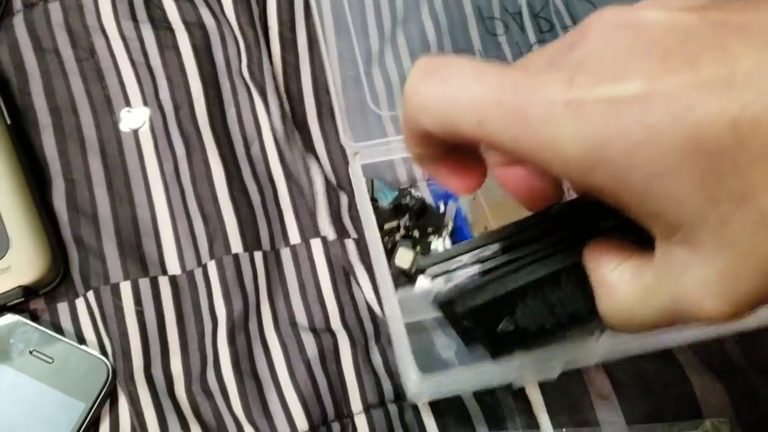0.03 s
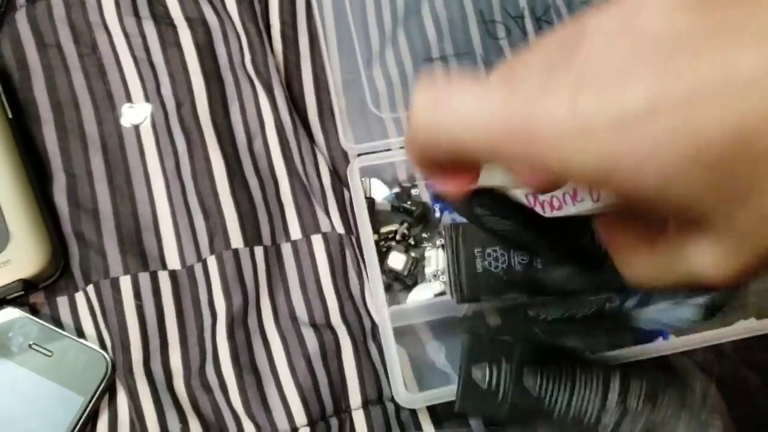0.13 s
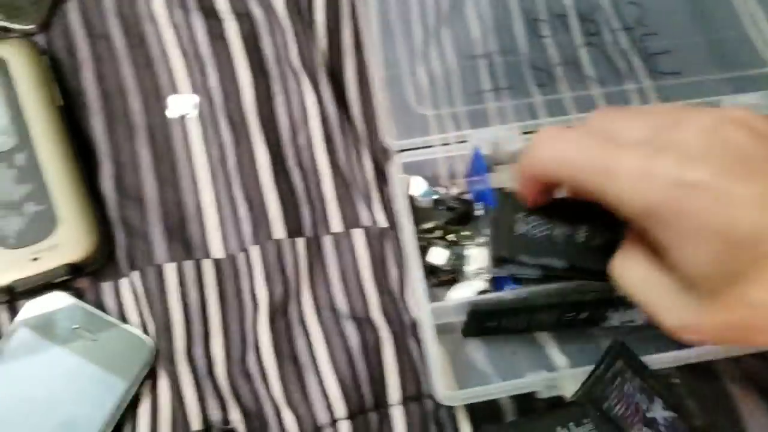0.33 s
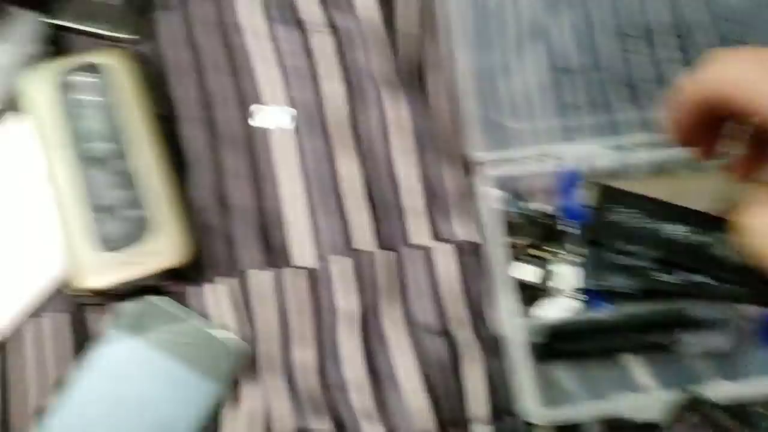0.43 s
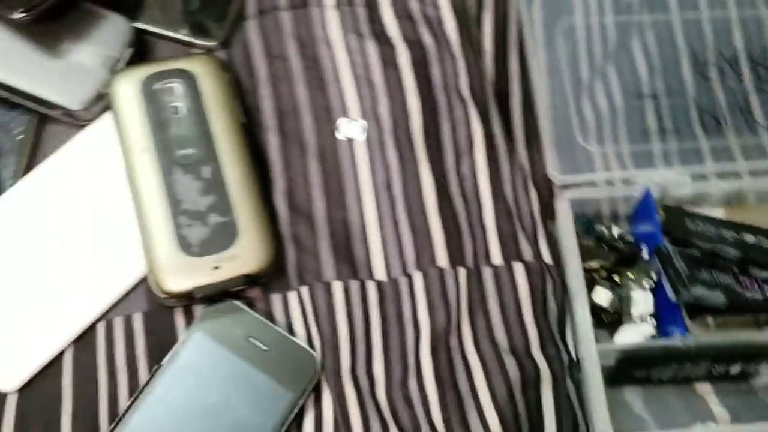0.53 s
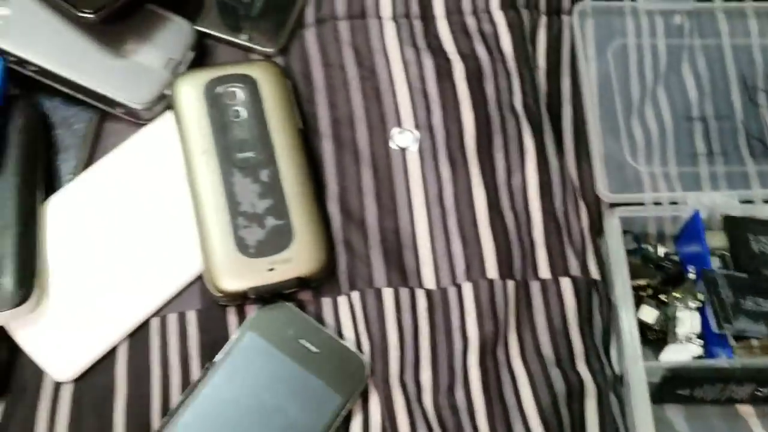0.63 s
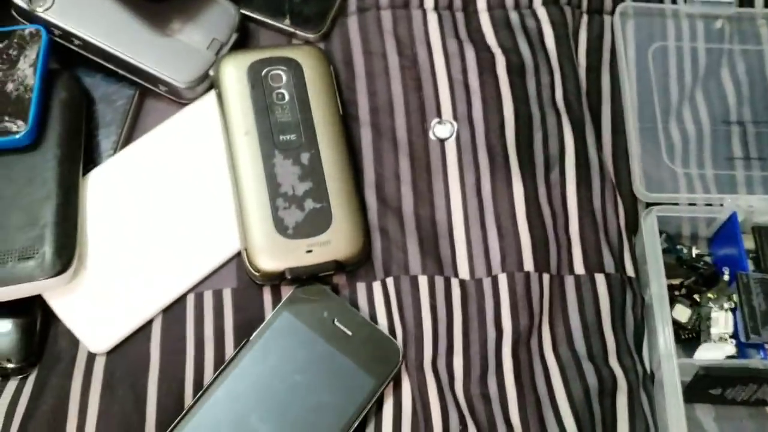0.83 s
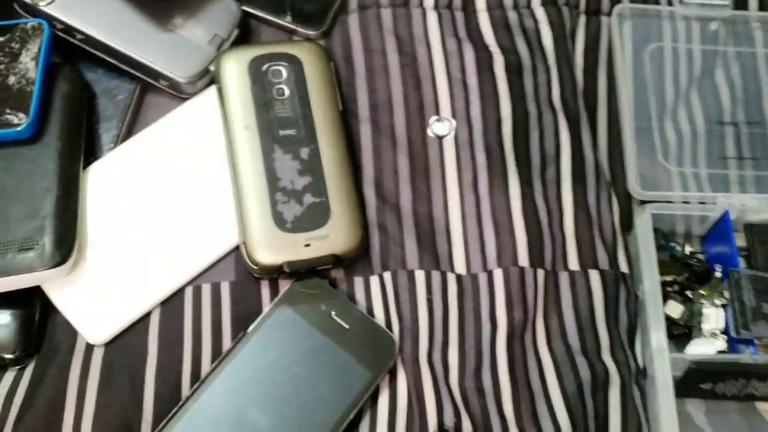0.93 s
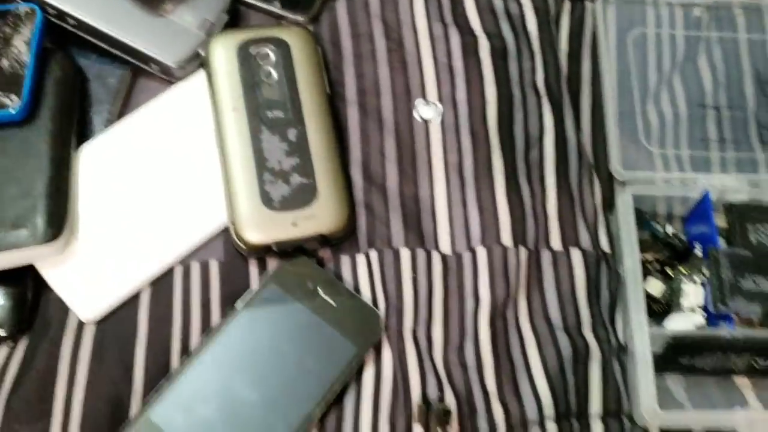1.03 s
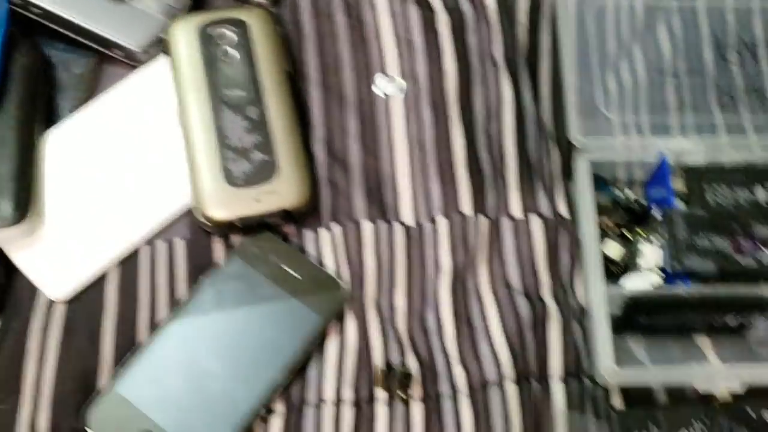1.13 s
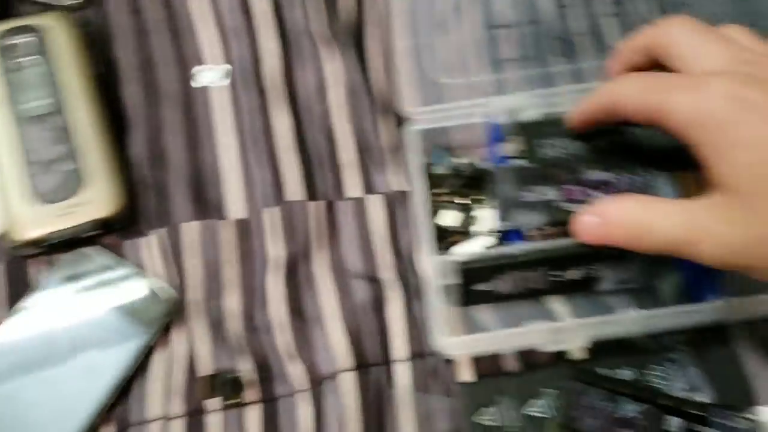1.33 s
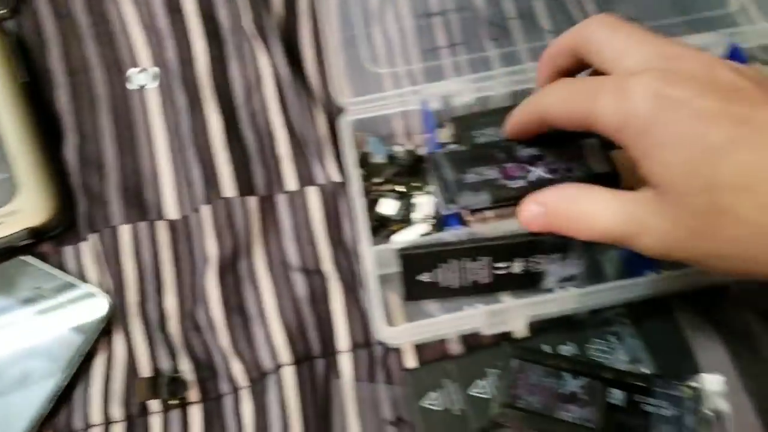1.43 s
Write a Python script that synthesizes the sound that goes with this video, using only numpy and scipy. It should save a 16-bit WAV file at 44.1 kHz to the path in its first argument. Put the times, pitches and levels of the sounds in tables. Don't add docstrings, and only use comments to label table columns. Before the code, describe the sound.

Small flat parts clatter into a hollow plastic box in one short burst, then settle

```python
import sys
import numpy as np
from scipy import signal
from scipy.io import wavfile
from scipy.ndimage import uniform_filter1d

SR = 44100
rng = np.random.default_rng(int(sys.argv[2]) if len(sys.argv) > 2 else 0)


def master_out(mix):
    frames = np.transpose(np.atleast_2d(mix))
    ceiling = np.clip(frames, -1, 1)
    pcm = np.round(ceiling * 32767).astype(np.int16)
    wavfile.write(sys.argv[1], SR, pcm)


def convert_level_to_amplitude(level_db):
    exponent = np.asarray(level_db, float) / 20
    return 10 ** exponent


N = 66150

# f/Hz, level/dB
BRIGHT = [(300, -24.5), (1200, -10), (2500, -17), (3300, -0.5), (6500, -8.5), (13000, -5), (16000, -8.5)]
# f/Hz, level/dB
DULL = [(88, -20), (150, -3), (259, -11.5), (1080, -7.5), (1340, -11), (1790, -5.5), (12400, -23.5),
        (15100, -24.5), (16000, -51.5)]


def evened(x):
    return x / np.sqrt(np.mean(x ** 2) + 1e-20)


def read(points, hz):
    f, value = np.transpose(points)
    return np.interp(np.log(hz + 1), np.log(f + 1), value)


def add(mix, start, sound):
    part = mix[round(start * SR):][:len(sound)]
    part += sound[:len(part)]


def high(x, hz, order=2):
    return signal.sosfilt(signal.butter(order, hz, "high", fs=SR, output="sos"), x)


def colour(x, points, share=1):
    hz = abs(np.fft.fftfreq(2048, 1 / SR))
    log_gain = share * read(points, hz) * np.log(10) / 20
    taps = np.fft.ifft(np.exp(np.conj(signal.hilbert(log_gain)))).real[:1024]
    return signal.oaconvolve(x, taps)[:len(x)]


def resonate(x, hz, width):
    return signal.lfilter(*signal.iirpeak(min(hz, SR / 2.2), hz / width, SR), x)


def air():
    # f/Hz, level/dB
    air_tone = [(25, -12.5), (114, -6), (260, -14), (440, -32.5), (1700, -36.5), (2690, -31.5),
                (4000, -28.5), (16000, -36.5)]
    shared, left, right = (colour(noise, air_tone) for noise in rng.standard_normal((3, N)))
    low = signal.butter(2, 700, fs=SR)
    rumble = signal.lfilter(*low, shared)
    hiss = np.array([noise - signal.lfilter(*low, noise) for noise in (left, right)])
    return convert_level_to_amplitude(-68.5) * evened(rumble + hiss)


def grains():
    per_s, spread_db = 6000, 2.5
    size = convert_level_to_amplitude(spread_db * np.minimum(rng.exponential(1, N), 5))
    clicks = size * (rng.random(N) < per_s / SR) * rng.choice([-1., 1.], N)
    return evened(clicks) + 0.6 * rng.standard_normal(N)


def jostle():
    # t/s, small pieces level/dB, rubbing on walls level/dB
    jostling = [(0, -85, -81.5), (0.114, -65.5, -74.5), (0.13, -41, -48), (0.203, -41.5, -50.5),
                (0.211, -23, -23.5), (0.328, -36, -32.5), (0.456, -46.5, -40.5), (0.486, -55.5, -54.5),
                (0.6, -50.5, -56.5), (0.624, -45.5, -37), (0.721, -58.5, -61), (0.828, -81, -49.5),
                (0.922, -99, -95), (1.038, -77, -108), (1.079, -64, -77.5), (1.19, -65, -68),
                (1.321, -69.5, -74), (1.469, -70, -56.5)]
    s, pieces_db, walls_db = np.transpose(jostling)
    t = np.arange(N) / SR
    pieces = evened(high(colour(grains(), BRIGHT), 1500))
    walls = evened(colour(grains(), DULL))
    level = np.interp(t, s, walls_db)
    edge = high(walls, 750)
    softened = walls - edge + edge * convert_level_to_amplitude(0.085 * (level - level.max()))
    return convert_level_to_amplitude(np.interp(t, s, pieces_db)) * pieces + convert_level_to_amplitude(level) * softened


def rubs():
    # t/s, length/s, level/dB, f/Hz, width/Hz
    drags = [
        (0.065, 0.075, -69.5, 1770, 620),
        (1.105, 0.037, -68.5, 1040, 210),
        (1.145, 0.14, -64, 280, 220),
        (1.432, 0.035, -52, 980, 270),
        (1.40, 0.098, -69.5, 2200, 2500),
    ]
    out = np.zeros(N)
    for start, length, db, hz, width in drags:
        t = np.arange(0, min(length, 0.2), 1 / SR)
        noise = rng.standard_normal(9000)
        rough = evened(resonate(resonate(noise, hz, width), hz, width))[:len(t)]
        add(out, start, convert_level_to_amplitude(db) * np.sin(np.pi * (t / length) ** 0.63) * rough)
    return out


def tick(db, hz, t60):
    noise = rng.standard_normal(3000)
    t = np.arange(len(noise)) / SR
    hiss_db = min(15 * np.log2(hz / 4000), 0)
    hiss = convert_level_to_amplitude(hiss_db) * evened(colour(noise, BRIGHT))
    ring = convert_level_to_amplitude(-3) * evened(resonate(noise, hz, hz / 3))
    fade = convert_level_to_amplitude(db - 7 - 60 * t / max(t60, 0.004))
    rise = np.minimum(t / 0.00087, 1)
    return high(fade * rise * (hiss + ring), min(0.7 * hz, 6000), order=4)


def ticking():
    # t/s, level/dB, f/Hz, time to fade 60 dB/s
    tick_events = [(.1185, -27, 3463, 0.012), (0.125, -25, 3600, 0.018), (0.147, -12, 14600, 0.011),
                   (0.1529, -19, 5200, 0.021), (.162, -26, 4130, 0.01), (.21, -15, 2900, 0.06),
                   (0.229, -14.5, 5600, 0.067), (0.2535, -8, 2900, 0.025), (.284, -18.5, 3730, 0.042),
                   (.348, -35, 12600, 0.011), (0.3703, -29, 4800, 0.057), (0.4034, -8.5, 3000, 0.02),
                   (0.518, -43, 5400, 0.045), (0.5814, -31.5, 12000, 0.018), (0.607, -19, 3860, 0.032),
                   (0.6843, -27.5, 8300, 0.028), (0.758, -35.5, 3900, 0.025), (.768, -30, 6030, 0.036),
                   (1.048, -35.5, 3900, 0.009), (1.1072, -46, 3540, 0.018), (1.161, -50, 13530, 0.026),
                   (1.3362, -40.5, 2650, .012), (1.356, -44, 3810, 0.054), (1.476, -23.5, 3510, 0.088),
                   (.1435, -30, 13000, .015), (.1555, -19, 12000, .012), (.1825, -27.5, 3600, .012),
                   (.1972, -23.5, 2820, .015), (.2165, -14.5, 4500, .015), (.296, -14.5, 4000, .012),
                   (.3085, -11, 3400, 0.017), (.3225, -24.5, 4500, .012), (.4135, -13, 3500, .015),
                   (.4525, -25, 3500, .015), (.5815, -41, 5000, .025), (.6335, -27, 12000, .012),
                   (.696, -36, 5000, .015), (.735, -46, 9000, .012), (1.188, -50, 12500, .01),
                   (1.262, -53, 11000, .01), (1.3418, -52.5, 11000, .015), (1.3565, -38.5, 11500, .02),
                   (1.458, -49, 3460, .03), (.2125, -13, 12100, .02), (0.2551, -20, 11500, .015),
                   (.4045, -32, 9200, 0.011), (.3815, -16, 3520, 0.016)]
    out = np.zeros(N)
    for start, db, hz, t60 in tick_events:
        add(out, start, tick(db, hz, t60))
    return out


def knock(db, hz, ring_db, crack_db, reach_db):
    # f/Hz, level/dB
    box = [(200, -23.5), (255, -7.5), (318, -2.5), (423, -10), (640, -2), (765, -1.5), (820, 7.5), (926, 1),
           (1075, 8), (1190, 7.5), (1620, 11), (2080, 21), (2245, -19), (2900, 7.5)]
    luck = rng.standard_normal(5000)
    t = np.arange(len(luck)) / SR
    cycles = 3.3 * (hz / 1000) ** 0.4
    push = -np.sin(2 * np.pi * hz * t) * convert_level_to_amplitude(-60 * t * hz / (4 * cycles * (hz / 1000) ** 0))

    f, level = np.transpose(box)[:, :, None]
    near = reach_db * abs(np.log2(f / hz)) + 5 * luck[:len(box), None]
    t60 = 0.041 * (1000 / f) ** 0.75
    detune = 1 + 0.042 * luck[::-1][:len(box), None]
    modes = convert_level_to_amplitude(level + near - 60 * t / t60) * np.sin(2 * np.pi * f * detune * t)
    ring = -modes.sum(0)

    rough = evened(colour(luck * abs(luck) ** 0.34, DULL))
    crack = rough * convert_level_to_amplitude(crack_db - 60 * t / 0.036) * np.minimum(t / 0.0019, 1)
    onset = np.minimum(t * hz / 0.14, 1)
    body = (push + convert_level_to_amplitude(ring_db) * ring / abs(ring).max()) * onset
    return convert_level_to_amplitude(db) * high(body + crack, 0.4 * hz)


def knocking():
    # t/s, peak level/dB, f/Hz, box ring level/dB
    tumble = [(0.1248, -23.5, 2070, -0.5), (.13, -36.5, 1070, -12), (0.155, -34, 1670, -1),
              (.196, -20.5, 333, -16), (0.2092, -7.5, 820, 1.5), (.2158, -5.5, 1630, 4),
              (0.2273, -10, 307, 5.5), (0.2266, -6, 1540, -0.5), (.245, -11.5, 1090, -21),
              (.2545, -9, 832, -14), (0.262, -21, 890, -27), (0.2767, -17, 277, -4), (.284, -20, 870, 5),
              (0.3008, -15, 293.7, -23), (0.308, -45, 1087, -11), (0.318, -28, 300.5, -21),
              (.34, -31, 436, 0), (.344, -29, 860, 7.5), (0.3641, -19, 2090, -3), (0.368, -25.5, 259, -21),
              (.399, -18, 310, -16), (0.4006, -14.5, 817, -8.5), (0.4049, -20, 1014, 6),
              (.4105, -23, 800, -4), (.4435, -26, 390, 7), (0.4518, -30, 290, 7), (0.456, -36.5, 400, -10),
              (1.476, -32, 1230, -4.5), (1.4787, -31.5, 1780, -3.5), (1.482, -36.5, 780, 2),
              (0.1203, -38, 2010, 2), (0.2196, -18.5, 1450, -7), (0.2368, -21.5, 920, -6.5),
              (.2575, -29, 1600, -6), (.2665, -35, 1207, -7), (0.3218, -30, 999, -9), (.3495, -32, 910, -1),
              (.3735, -31, 1300, 3), (.4135, -27.5, 980, 5), (.4285, -31, 900, -4),
              (1.4876, -34, 1096, -2.5)]
    # t/s, peak level/dB, f/Hz
    settle = [(0.496, -42, 276), (0.523, -41.5, 377), (0.551, -46.5, 770), (0.624, -40.5, 341),
              (0.695, -48, 225), (0.738, -50, 382), (0.781, -29.5, 700), (0.823, -46, 261.4),
              (1.176, -52.5, 248.7), (1.19, -53.5, 244.2), (1.206, -48.5, 276.3), (1.445, -51.5, 1044),
              (.609, -35.5, 1250), (.636, -36, 485), (.6555, -32.5, 590), (1.158, -60, 260),
              (.96, -61, 664), (1.109, -57.5, 1070), (1.245, -61.5, 313), (1.275, -59.5, 338),
              (1.3365, -50, 450), (1.3525, -44.5, 260), (1.3512, -45, 703.6), (.126, -48.5, 367),
              (.153, -47, 426), (.585, -53, 240), (.66, -45.5, 220), (.80, -43, 250), (1.125, -63.5, 796),
              (1.165, -58, 620), (1.185, -58, 780), (1.215, -59.5, 560), (1.40, -63.5, 350)]
    out = np.zeros(N)
    for start, db, hz, ring_db in tumble:
        add(out, start, knock(db, hz, ring_db, crack_db=-3, reach_db=-6))
    for start, db, hz in settle:
        add(out, start, knock(db, hz, ring_db=-2, crack_db=-14.5, reach_db=-14))
    return out


def bed(knocks):
    memory = np.exp(-1 / (0.015 * SR))
    effort = np.sqrt(abs(signal.lfilter([1], [1, -memory], knocks ** 2)))
    band = signal.butter(2, [45, 170], "band", fs=SR, output="sos")
    low = signal.sosfilt(band, rng.standard_normal(N))
    return convert_level_to_amplitude(-54) * evened(low * effort ** 0.58)


def slides():
    starts = .6055, .7755
    # length/s, level/dB
    slide_events = [
        (0.048, -32.5),
        (0.069, -32),
    ]
    # f/Hz, width/Hz, level/dB
    piece = [(3620, 61, -6.5), (3930, 190, -2), (5840, 1860, -9), (12060, 570, -5.5)]
    slips, t = grains(), np.arange(N) / SR
    rings = evened(sum(convert_level_to_amplitude(db) * evened(resonate(slips, f, width)) for f, width, db in piece))
    body = evened(rings + 1.4 * evened(colour(slips, BRIGHT)))
    shape = np.zeros(N)
    for start, (length, db) in zip(starts, slide_events):
        hold = 2.8 * np.maximum(t - start, 0) / length
        fade = 690 * np.maximum(t - start - 0.41 * length, 0)
        shape += convert_level_to_amplitude(db - hold - fade) * np.clip((t - start) / 0.00096, 0, 1)
    return shape * body


def scatter(x):
    # f/Hz, random phase/radians
    wandering = [(400, 0.078), (1000, 0.43), (2500, 2.1), (14000, 3.7)]
    lag_s = 0.00012
    hz, _, z = signal.stft(x, SR, nperseg=128, noverlap=96)
    smooth = uniform_filter1d(rng.standard_normal(z.shape), size=3, axis=0)
    wander = evened(uniform_filter1d(smooth, size=40, axis=1))
    turn = read(wandering, hz)[:, None] * wander - 2 * np.pi * hz[:, None] * lag_s
    return signal.istft(z * np.exp(1j * turn), SR, nperseg=128, noverlap=96)[1][:N]


def room(x):
    # f/Hz, time to fade 60 dB/s
    room_t60 = [(200, 0.17), (3600, 0.18), (12000, 0.13)]
    taps = np.zeros((2, SR // 2))
    at = np.arange(60, SR // 2 - 20, 20) + rng.integers(0, 20, (2, (SR // 2 - 61) // 20))
    np.put_along_axis(taps, at, rng.choice([-1., 1.], at.shape), 1)
    hz, t, z = signal.stft(taps, SR, nperseg=256)
    same = (1 / (1 + (hz / 1100) ** 2))[:, None]
    z = np.array([z[0], same * z[0] + np.sqrt(1 - same ** 2) * z[1]])
    fade = convert_level_to_amplitude(-60 * t / read(room_t60, hz)[:, None])
    tail = signal.istft(z * fade, SR, nperseg=256)[1]
    return signal.fftconvolve(x[None], tail / np.linalg.norm(tail[0]), axes=1)[:, :N]


def scene():
    knocks = knocking()
    parts = knocks + ticking() + jostle() + slides()
    direct = np.array([scatter(parts), parts])
    return direct + convert_level_to_amplitude(-12) * room(parts) + bed(knocks) + air() + rubs()


def low_pass(x):
    return signal.sosfilt(signal.butter(12, 16620, fs=SR, output="sos"), x)


def record(dry):
    # f/Hz, left minus right level/dB
    ports = [(60, 1.55), (640, -0.5), (1400, -2), (2800, 7), (5500, 6), (9000, -0.5), (15000, -3)]
    left = colour(dry[0], ports, share=1 / 2)
    right = colour(dry[1], ports, share=-1 / 2)
    ceiling = 1.1
    soft = ceiling * np.tanh(np.array([left, right]) / ceiling)
    treble_cut = signal.firwin(255, 15600, window=("kaiser", 8), fs=SR)
    mix = signal.oaconvolve(soft, treble_cut[None], "same")
    return low_pass(mix)


dry = scene()
out = record(dry)
master_out(out)
```